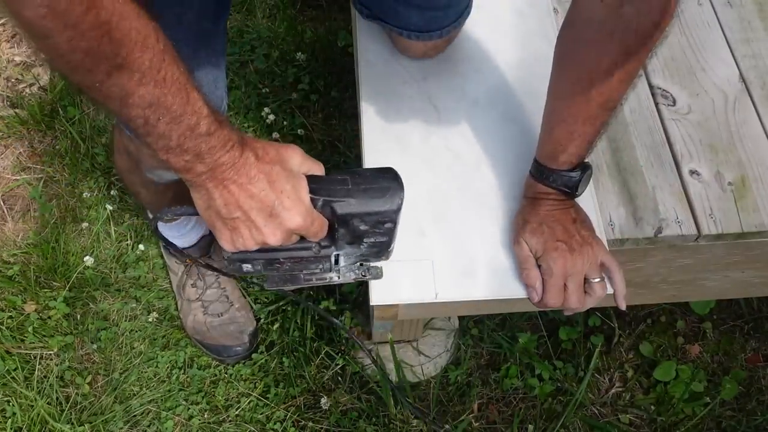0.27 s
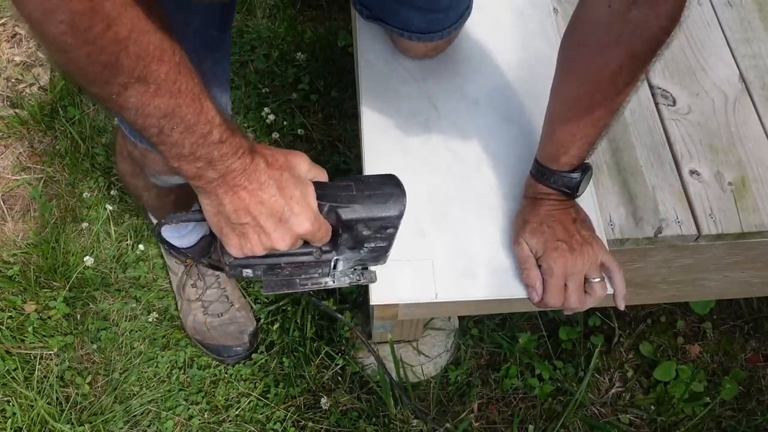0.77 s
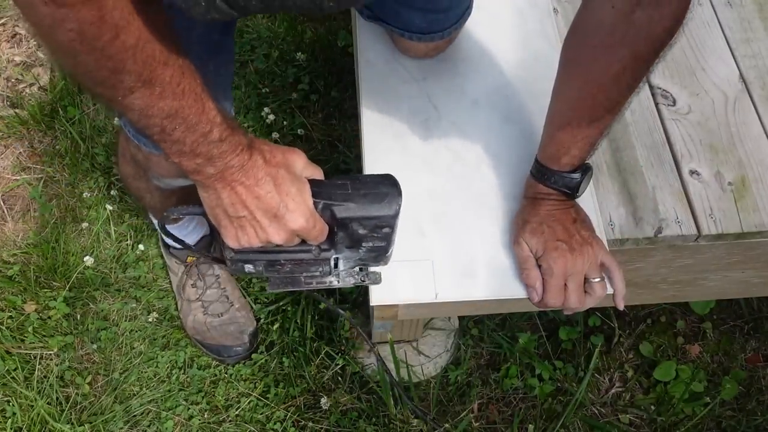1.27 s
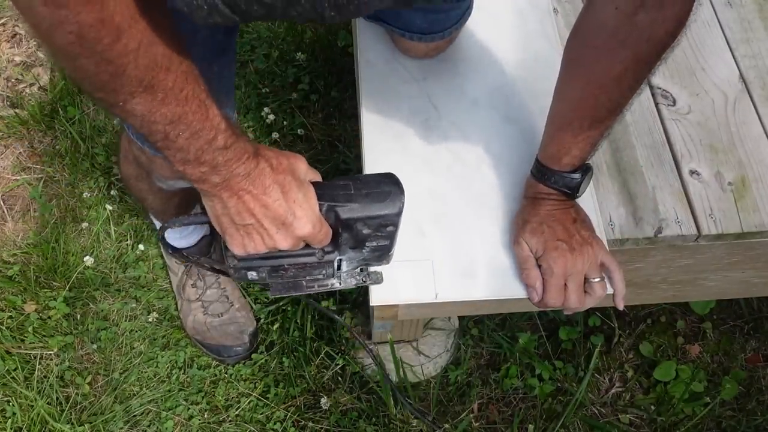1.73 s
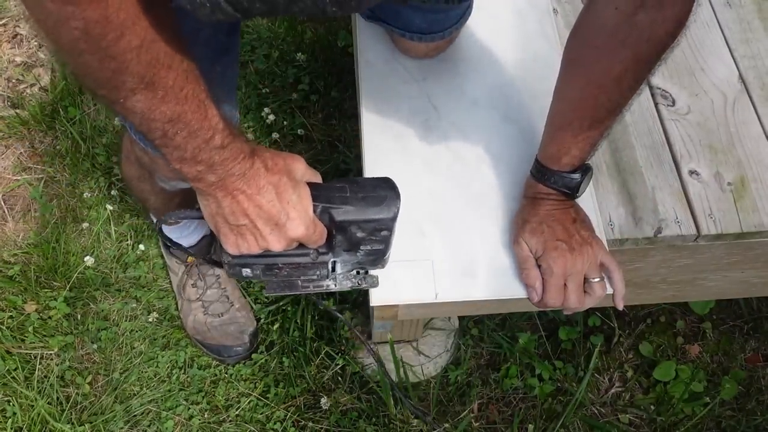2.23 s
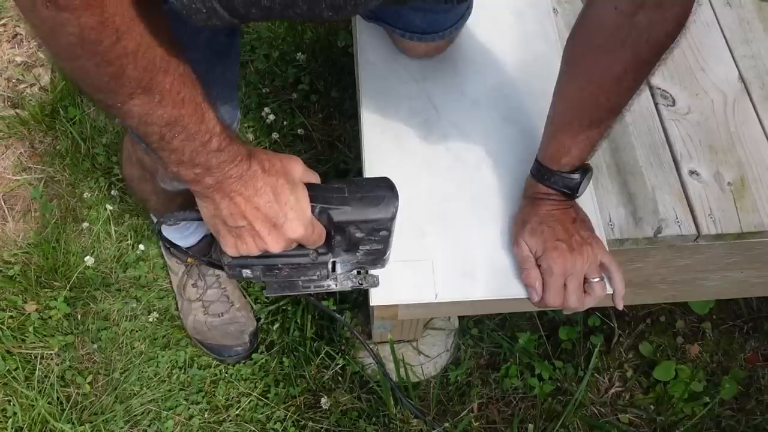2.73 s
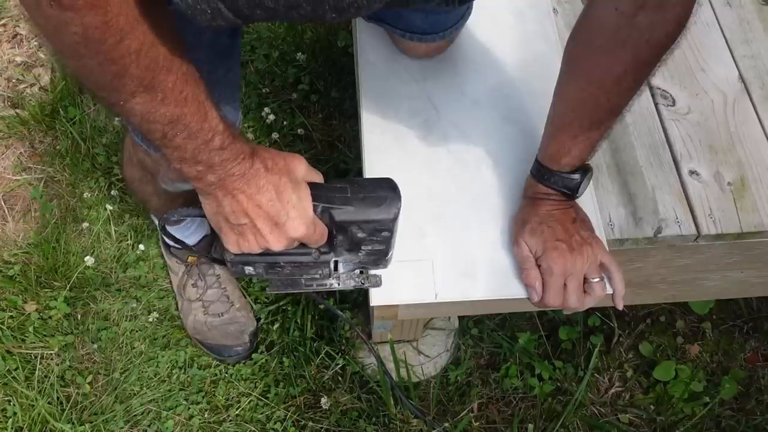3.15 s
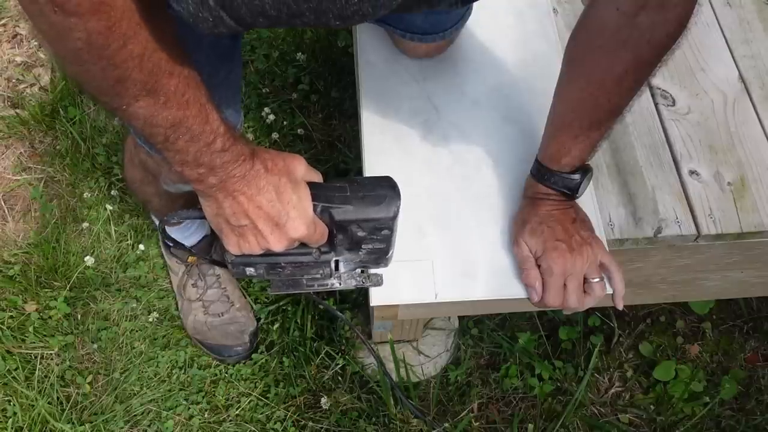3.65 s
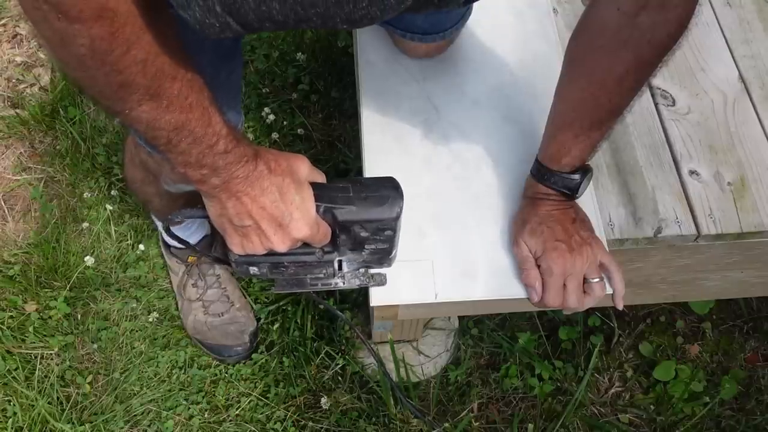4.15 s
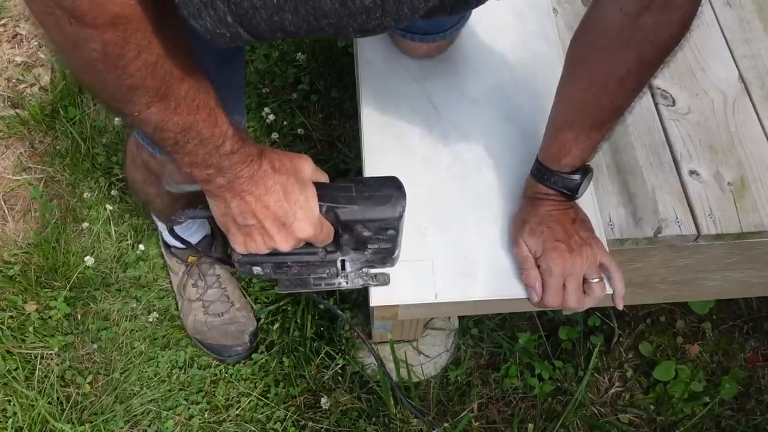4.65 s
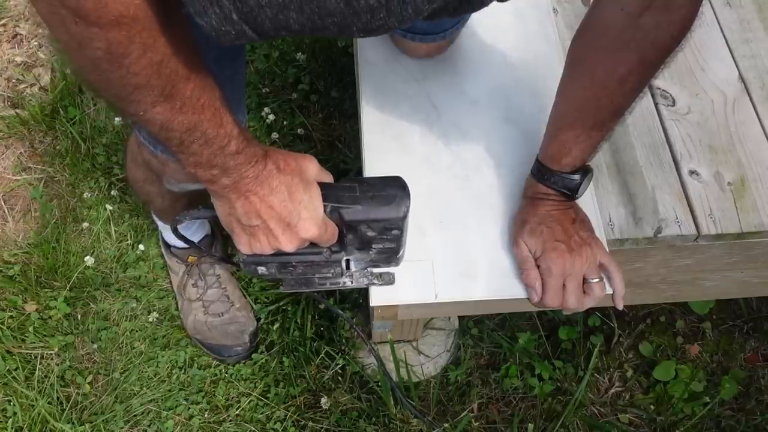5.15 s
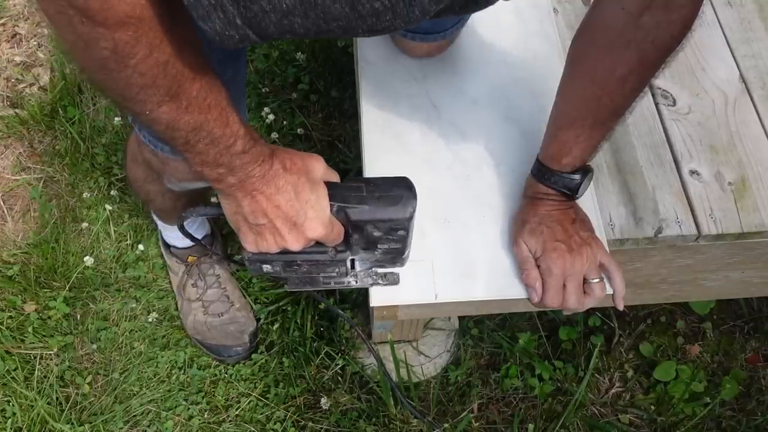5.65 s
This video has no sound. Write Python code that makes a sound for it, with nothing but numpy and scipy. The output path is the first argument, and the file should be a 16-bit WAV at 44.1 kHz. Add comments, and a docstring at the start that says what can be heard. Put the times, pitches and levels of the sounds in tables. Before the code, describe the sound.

Quiet garden with birdsong and insect chirps and a couple of shoe knocks, then a corded jigsaw roars into a wooden plank and keeps cutting.

```python
"""Jigsaw starting on a plank

A corded jigsaw starts on a plank that lies on a deck in a garden. The motor jerks its gears once per
mains cycle, the teeth rasp as noise that swells on every stroke, and housing, blade and plank ring.
The shoe knocks on the plank, mostly before and at the start. Two birds sing sine notes in the trees,
insects chirp in the grass, and filtered noise makes the breeze and the far rumble."""
import sys
import numpy as np
from scipy import signal
from scipy.fft import rfft, irfft, next_fast_len
from scipy.io import wavfile
from scipy.ndimage import uniform_filter1d, map_coordinates

SR = 44100
rng = np.random.default_rng(int(sys.argv[2]) if len(sys.argv) > 2 else 0)


def master(y):
    """Save y as 16-bit WAV."""
    cut = np.clip(np.atleast_2d(y).T, -1, 1)
    pcm = np.round(cut * 32767)  # scale
    wavfile.write(sys.argv[1], SR, pcm.astype(np.int16))


N = 259749
T = np.arange(N) / SR


def amp(db):
    """Decibels to amplitude."""
    return 10 ** (np.asarray(db) / 20)


def unit(x):
    """x scaled to an RMS of 1 over the whole scene."""
    return x / np.sqrt(np.mean(x ** 2) + 1e-20)


def noise():
    """White noise."""
    return rng.standard_normal(N)


def curves(rows):
    """One value per sample for each column after the time."""
    s, *cols = np.transpose(rows)
    return [np.interp(T, s, col) for col in cols]


def wobble(rate_hz):
    """A smooth random curve through rate_hz knots a second."""
    knots = rng.standard_normal(int(N * rate_hz / SR) + 4)
    return map_coordinates(knots, [T * rate_hz])


def filtered(x, response):
    """x times a complex response of frequency."""
    m = next_fast_len(N + SR // 2)
    return irfft(rfft(x, m) * response(np.fft.rfftfreq(m, 1 / SR)), m)[..., :N]


def coloured(x, spectrum):
    """x through (hz, gain_db) points on a log axis."""
    hz, db = np.transpose(spectrum)
    return filtered(x, lambda f: amp(np.interp(np.log(f + 1), np.log(hz + 1), db)))


def rung(x, modes):
    """x through causal resonances (hz, width_hz, gain_db) of alternating sign."""
    def response(f):
        total = 0
        for k, (hz, width, db) in enumerate(modes):
            resonance = 1j * f * width / (hz * hz - f * f + 1j * f * width)
            total = total + (-1) ** k * amp(db) * resonance
        return total
    return filtered(x, response)


def blows(times, gains):
    """Single sharp pushes, one sample each."""
    return np.bincount(np.round(np.asarray(times) * SR).astype(int), gains, N)[:N]


def bursts(times, gains, t60):
    """Noise that jumps up at each time and dies away 60 dB in t60 seconds."""
    shape = signal.lfilter([1], [1, -amp(-60 / (t60 * SR))], blows(times, gains))
    return shape * noise()


# Far rumble level: start_s, level_db
RUMBLE_LEVEL = [(0, -45), (.5, -44.5), (1.2, -44), (1.8, -46.5), (2.0, -54), (2.7, -56), (3.3, -58),
                (3.7, -59), (4.2, -62), (4.8, -56.5), (5.9, -44.5)]
# Spectra of rumble, leaf rustle and bright leaf shimmer: hz, gain_db
RUMBLE_SPECTRUM = [(12, -43), (28, -3), (48, -4.5), (97, -5), (135, -21), (206, -21), (242, -13.5),
                   (296, -49), (500, -45), (650, -71), (1100, -120)]
RUSTLE_SPECTRUM = [(76, -24), (130, 1.5), (189, -11), (248, -4), (301, -9.5), (468, -11.5), (620, -19),
                   (750, -18.5), (950, -19.5), (1250, -20.5), (1600, -23), (1810, -25), (2020, -32),
                   (3500, -25), (4550, -63), (7700, -120)]
SHIMMER_SPECTRUM = [(2060, -35), (3500, -6), (4440, 0.5), (6670, -8.5), (8300, -5), (11000, -14.5),
                    (15600, -16)]
# Far engine: pitch_hz, width_hz, gain_db
DRONE_MODES = [(92, 2.8, 1), (243.3, 8.7, -5)]
# Breeze in the leaves: start_s, strength_0_to_1
GUST_STRENGTH = [(0, 0.37), (.13, 0.5), (.3, 1), (.46, 0.94), (.87, 0.66), (1.05, 0.36), (1.5, 0.18),
                 (1.8, 0.6)]
# Narrow flickering hiss near 2 kHz: start_s, level_db
FAINT_BAND_LEVEL = [(0, -84), (.2, -64), (.5, -63), (.9, -69), (1.3, -85)]
# Air moving past the microphone: start_s, level_db
BUFFET_LEVEL = [(0, -45), (.4, -49), (.8, -63), (1.5, -66), (2.5, -63), (3.2, -66), (3.7, -62), (4.2, -66),
                (5.0, -53), (5.9, -58)]
RUSTLE_DB, SHIMMER_DB = (-60, 9), (-79.5, 20.5)  # (calm, gain at full gust)


def air():
    """Noise as rumble, drone, gusty leaves, a faint narrow band and air buffeting the microphone."""
    gust = curves(GUST_STRENGTH)[0]
    rumble = unit(coloured(noise(), RUMBLE_SPECTRUM))
    drone = amp(-12.5) * unit(rung(rung(noise(), DRONE_MODES), DRONE_MODES))
    far = amp(curves(RUMBLE_LEVEL)[0]) * (rumble + drone)
    rustle = amp(RUSTLE_DB[0] + RUSTLE_DB[1] * gust) * unit(coloured(noise(), RUSTLE_SPECTRUM))
    shimmer = amp(SHIMMER_DB[0] + SHIMMER_DB[1] * gust) * unit(coloured(noise(), SHIMMER_SPECTRUM))
    band = unit(rung(rung(noise(), [(2000, 150, 0)]), [(2000, 200, 0)]))
    band = band * amp(curves(FAINT_BAND_LEVEL)[0] + 1.9 * wobble(31.7))
    buffet = unit(coloured(noise(), [(8, -30), (18, 0), (35, -5), (55, -25), (120, -80)]))
    return far + rustle + shimmer + band + amp(curves(BUFFET_LEVEL)[0]) * buffet


def note(rows, edge_s=0.0029):
    """A sine along (start_s, pitch_hz, level_db) rows with soft ends."""
    s, hz, db = np.transpose(rows)
    end_s = s[-1] + edge_s
    span = slice(round(s[0] * SR), round(end_s * SR))
    t, out = T[span], np.zeros(N)
    ends = np.clip(np.minimum(t - s[0], end_s - t) / edge_s, 0, 1)
    phase = 2 * np.pi * np.cumsum(np.interp(t, s, hz)) / SR
    out[span] = np.sqrt(2) * ends * amp(np.interp(t, s, db)) * np.sin(phase)
    return out


# Runs of cricket chirps: start_s, chirp_count
CRICKET_RUNS = [(.027, 12), (.689, 1), (.760, 20)]
# Katydid buzzes: start_s
BUZZ_STARTS = [.08, .28, .5, .73, .965, 1.195, 1.42, 1.655]
CHIRP_EVERY_S, BUZZ_S = .054, 0.047
CHIRP_AT_0S_DB, BUZZ_AT_0S_DB, FADE_DB_PER_S = -63, -69.5, 1.5


def insects():
    """Short pure cricket chirps, slower and higher katydid noise buzzes, and a steady far chorus."""
    times = np.concatenate([s + CHIRP_EVERY_S * np.arange(count) for s, count in CRICKET_RUNS])
    cricket = np.zeros(N)
    for s in times:
        db = CHIRP_AT_0S_DB - FADE_DB_PER_S * s
        cricket += note([(s, 8100, db), (s + 0.012, 8080, db), (s + 0.019, 8050, db - 5)])
    gate = sum((T > s) & (T < s + BUZZ_S) for s in BUZZ_STARTS)
    buzz = unit(rung(rung(noise(), [(9100, 300, 0)]), [(9100, 300, 0)]))
    katydid = amp(BUZZ_AT_0S_DB - FADE_DB_PER_S * T) * gate * buzz
    swarm = [(7620, 700, -2.0), (8350, 500, -1)]
    chorus = amp(-74 + 1.2 * wobble(18.2)) * unit(rung(rung(noise(), swarm), swarm))
    return cricket + katydid + chorus


# Shoe contacts, drive into each filter: start_s, tap_db, thud_db, snap_db
SHOE_KNOCKS = [(0.086, -43, -45, -62), (0.094, -38, -52, -58), (0.101, -31, -39, -62),
               (0.112, -42, -41, -52), (0.13, -23, -38.5, -26), (0.833, -9.5, -28.5, -53),
               (1.027, -40, -50, -70), (1.036, -33.5, -47, -62), (1.047, -43, -45, -66),
               (1.057, -49, -45, -60), (1.187, -57, -65, -52), (1.652, -41, -57, -70),
               (1.727, -35, -60, -62), (1.779, -36, -54, -61), (1.8, -29, -47, -50), (1.813, -28, -49, -24),
               (1.818, -13, -28, -23), (1.829, -15, -24, -31), (3.011, -11, -36.5, -32),
               (3.055, -13, -43, -30), (4.214, -5.5, -36, -29), (4.258, -5, -42, -29)]
# Shoe tap and deck resonances: pitch_hz, width_hz, gain_db
TAP_MODES = [(685, 120, 0), (1300, 240, -3.5), (1720, 94, -3.5), (2100, 200, -3.5), (3430, 1100, -16)]
DECK_MODES = [(48, 43, -24), (89, 38, -21), (139, 11.3, 6.5), (247, 74, -5.5), (431, 21, 2.5)]


def knocks():
    """Each contact taps the shoe, thuds in the deck and snaps in the treble."""
    s, tap_db, thud_db, snap_db = np.transpose(SHOE_KNOCKS)
    push = rung(blows(s, amp(tap_db)), [(1490, 4200, 0)])
    tap = rung(amp(6.0) * bursts(s, amp(tap_db), t60=0.047) + amp(12.0) * push, TAP_MODES)
    thud = amp(50.5) * rung(rung(blows(s, amp(thud_db)), DECK_MODES), [(242, 2500, 0)])
    snap = rung(bursts(s, amp(snap_db), t60=0.01), [(5900, 3000, 0)])
    return tap + thud + amp(-10.0) * rung(snap, [(5000, 8000, 0)])


def song(parts, calls):
    """One pattern of notes sung at each call's (start_s, level_db, pitch_ratio)."""
    out = np.zeros(N)
    for s, db, ratio in calls:
        for part in parts:
            out += note(np.multiply(part, [1, ratio, 1]) + [s, 0, db])
    return out


def trees(x, t60):
    """Echoes from trunks and leaves: a decaying noise tail."""
    t = T[:SR // 2]
    tail = rng.standard_normal(len(t)) * amp(-60 * t / t60)
    return signal.fftconvolve(x, tail / np.linalg.norm(tail))[:N]


# Wren phrase and trill turn, note by note, from the call's start, level and pitch ratio:
# offset_s, pitch_hz (at ratio 1), level_db (relative)
WREN_PHRASE = [
    [(-.008, 2200, -13), (.01, 2290, -5), (.036, 2310, -3), (.05, 2320, -7), (.082, 2330, -11)],
    [(.036, 2330, -10), (.046, 2650, -9)],
    [(.052, 2850, -14), (.059, 2700, -11), (.062, 2650, 1), (.074, 2450, -2)],
    [(.106, 1650, -9), (.115, 2500, -5), (.128, 3150, -5), (.14, 3450, -1), (.152, 3550, -8)],
    [(.191, 4400, -12), (.197, 4150, -10), (.201, 3700, -9), (.207, 3050, -9), (.211, 2880, -1),
     (.223, 2820, -3)],
]
TRILL_TURN = [
    [(-.012, 4240, -9), (.01, 4410, -6)],
    [(.002, 5160, -12), (.02, 4990, -3), (.046, 4810, -6)],
    [(.036, 4680, -7), (.05, 4100, -6), (.062, 3520, -7), (.075, 3100, -15)],
    [(.05, 5100, -10), (.075, 5010, -19), (.104, 4900, -16)],
]
# Second bird's long note: start_s, pitch_hz, level_db
WHISTLE_NOTE = [(0.54, 3000, -60), (0.55, 3000, -48), (0.584, 3090, -48), (0.602, 3160, -39.5),
                (0.665, 3236, -50), (0.682, 3032, -46), (0.71, 3220, -47.5), (0.83, 3192, -55),
                (0.9, 3170, -71)]
WREN_S, WREN_EVERY_S, WREN_DB, WREN_SWELL_DB = .334, .2322, -48.5, 0.57  # swell per phrase
WREN_PITCH_RATIO, WREN_RISE = .98, 0.0044  # first phrase, rise per phrase
TRILL_S, TRILL_EVERY_S, TRILL_DB = .869, .1008, -45.5
TRILL_FADE_DB, TRILL_SAG = 0.36, .006  # loss times turn number squared, pitch ratio lost per turn


def birds():
    """The wren repeats one phrase; the other bird whistles, then trills hoarsely, deeper in the trees."""
    phrases, turns = [], []
    for k in range(7):
        pitch_ratio = WREN_PITCH_RATIO + WREN_RISE * k
        phrases.append((WREN_S + WREN_EVERY_S * k, WREN_DB + WREN_SWELL_DB * k, pitch_ratio))
        turns.append((TRILL_S + TRILL_EVERY_S * k, TRILL_DB - TRILL_FADE_DB * k ** 2, 1 - TRILL_SAG * k))
    wren = song(WREN_PHRASE, phrases) * amp(3 * wobble(170)) * (1 + .3 * wobble(600))
    whistle = note(WHISTLE_NOTE, edge_s=0.013) * amp(1.4 * wobble(54.6))
    trill = song(TRILL_TURN, turns) * amp(1.5 * wobble(110)) * (1 + .7 * wobble(450))
    near = wren + whistle
    near_echoes = amp(-7) * (trees(near, t60=0.1) + trees(near, t60=1.0))
    return near + near_echoes + trill + amp(-0.5) * trees(trill, t60=0.41)


# Blade speed, held from each row on: start_s, stroke_rate_hz
STROKE_RATE = [(1.8, 20.625), (3.0, 21.45), (3.2, 23.45), (4.0, 22.2), (4.2, 21.25), (4.6, 23.25),
               (4.8, 24.2), (5.0, 22.7)]
FIRST_STROKE = .4  # part of a stroke done at time zero


def crank():
    """Blade strokes made so far; the stepped speed is smoothed over 1/6 s."""
    s, rate = np.transpose(STROKE_RATE)
    speed = rate[np.maximum(np.searchsorted(s, T) - 1, 0)] * (T > s[0])
    return FIRST_STROKE + np.cumsum(uniform_filter1d(speed, size=SR // 6, mode="nearest")) / SR


# How hard the teeth bite (first touch, pull back, cut proper): start_s, bite_0_to_1
TOOTH_BITE = [(1.82, 0.58), (1.92, 0.05), (1.97, 0.86), (2.18, 0.95), (2.195, 0.8), (2.235, 0.15),
              (2.42, 0.33), (2.56, 0.38), (2.72, 0.75), (3.1, 0.82)]
CUT_S = (3.87, 4.25)  # the blade sinks to full depth between these times


def loaded(law):
    """A level from (no bite dB, gain at full bite dB, further gain at full depth dB)."""
    idle_db, bite_db, deep_db = law
    return idle_db + bite_db * curves(TOOTH_BITE)[0] + deep_db * np.interp(T, CUT_S, [0, 1])


def rasp(spiky_db, clump_db):
    """Teeth tearing fibres: noise of uneven sizes, in clumps of a few ms."""
    spikes = np.minimum(rng.exponential(size=N), 5)
    sizes = amp(spiky_db * spikes + clump_db * wobble(170))
    return unit(sizes * noise())


# Housing and shoe resonances: pitch_hz, width_hz, gain_db
HOUSING_MODES = [(1260, 186, -4.5), (1662, 169, -2), (2042, 174, 1), (2350, 170, -1.5), (2630, 270, -3),
                 (3320, 760, -9.5), (4220, 660, -11.5), (5750, 920, -18.5)]
SHOE_MODES = [(755, 60, 0)]
# Treble of the rasp: hz, gain_db
HISS_SPECTRUM = [(2940, -5), (5000, -6), (6690, 0), (8650, 7), (10100, -5.5), (13100, -0.5), (15600, -3)]
# Shoe ring: start_s, level_db
SHOE_LEVEL = [(1.82, -27), (1.93, -40), (2.0, -29.5), (2.17, -28.5), (2.21, -31), (2.24, -31), (2.42, -30),
              (2.55, -35.5), (2.7, -37.5), (2.9, -40.5), (3.4, -40), (3.8, -45.5), (4.2, -33.5), (4.6, -54),
              (5.0, -40.5), (5.9, -35.5)]
HOUSING_DB, HISS_DB = (-28, 4.5, -0.5), (-56, 14, 3)  # laws for loaded()
SWELL_DB = (0.53, .5, 3)  # law for the swing over one stroke


def blade():
    """The rasp rings housing and shoe and swells on every stroke; the hiss swells more than the housing."""
    stroke = loaded(SWELL_DB) * np.cos(2 * np.pi * crank())
    uneven = wobble(35)  # the feed of the hand and the grain of the plank
    teeth = rasp(spiky_db=3.5, clump_db=2.5)
    housing = unit(rung(teeth, HOUSING_MODES))
    housing = housing * amp(loaded(HOUSING_DB) + 0.5 * stroke + 0.057 * uneven)
    hiss = unit(coloured(teeth, HISS_SPECTRUM))
    hiss = hiss * amp(loaded(HISS_DB) + 0.88 * stroke + uneven)
    shoe = unit(rung(rasp(spiky_db=1.5, clump_db=0.0), SHOE_MODES))
    return housing + hiss + amp(curves(SHOE_LEVEL)[0] + 1.4 * stroke) * shoe


# Narrow blade resonances: pitch_hz, width_hz, gain_db
BLADE_MODES = [(1580, 48, 1), (1710, 68, -0.5), (1896, 53, 1), (2030, 65, -1.5), (2107, 32, 1.5),
               (2214, 66, -7), (2363, 24, 5), (2650, 42, -2.5), (2680, 61, -4), (3580, 75, -4.5),
               (4716, 75, -9), (4810, 59, -12.5), (6140, 120, -19)]
BLADE_DB, BLADE_WAVER_DB = (-35, 7.5, -0.5), 2.5  # law for loaded(); each mode wavers on its own


def blade_ring():
    """The blade's narrow modes come and go as the kerf grips and frees it."""
    teeth = rasp(spiky_db=3.0, clump_db=3.5)
    modes = np.zeros(N)
    for hz, width, db in BLADE_MODES:
        mode = signal.lfilter(*signal.iirpeak(hz, hz / width, SR), teeth)
        modes += amp(db + BLADE_WAVER_DB * wobble(8)) * mode
    stroke = loaded(SWELL_DB) * np.cos(2 * np.pi * crank())
    return amp(loaded(BLADE_DB) + 0.86 * stroke) * unit(modes)


# Resonances of plank, its free end, and its thump on the deck: pitch_hz, width_hz, gain_db
PLANK_MODES = [(132.6, 11.6, -11), (255, 54, 0), (318, 66, 0), (398, 54, 2.5), (583, 103, -1),
               (913, 260, -2.5)]
FREE_END_MODES = [(175.4, 32, 0)]
THUMP_MODES = [(184, 105, -6.5), (273, 74, -2), (288, 53, -1), (414, 41, -8.5), (650, 170, -8.5)]
# How loosely the plank lies on the deck: start_s, looseness_0_to_1
LOOSENESS = [(2.9, 0.4), (3.2, 0.34), (4.1, 0.57), (4.3, 0.9), (4.4, 0.82), (4.6, 0.7), (4.95, 0.93),
             (5.25, 0.97), (5.45, 0.76), (5.9, 0.8)]
# Spells of the free end bouncing: start_s, length_s, level_db
BOUNCE_SPELLS = [(1.815, 0.024, -33.5), (2.01, 0.24, -36.5), (2.36, 0.046, -36), (3.02, 0.049, -42),
                 (5.376, 0.14, -40.5)]
# Rocking partials: stroke_rate_multiple, level_db (relative)
ROCK_PARTIALS = [(1, -20), (2, -14), (3, 1), (4, 5), (5, -12), (6, 9.5)]
SHAKE_DB, THUMP_DB, ROCK_DB = (-36, 7.5), (-59.5, 23.5), (-83, 52.5)  # (tight, gain per looseness)
ROCK_FULL = 0.707  # looseness at which the rocking stops growing
BOUNCE_REST_DB, BOUNCE_SLOPE_DB_PER_S = -53.5, 145  # between spells; rise and fall
SHAKE_PER_BOUNCE = 0.1  # dB of shaking per dB of bounce


def plank():
    """The plank shakes, its free end bounces, every stroke thumps it on the deck and rocks the saw."""
    loose, made = curves(LOOSENESS)[0], crank()
    bounce_db = np.full(N, BOUNCE_REST_DB)
    for s, length, db in BOUNCE_SPELLS:
        outside_s = np.maximum(0, np.maximum(s - T, T - s - length))
        bounce_db = np.maximum(bounce_db, db - BOUNCE_SLOPE_DB_PER_S * outside_s)
    shake_db = SHAKE_DB[0] + SHAKE_DB[1] * loose + SHAKE_PER_BOUNCE * (bounce_db - BOUNCE_REST_DB)
    drive = rasp(spiky_db=3.0, clump_db=3.0)
    shake = amp(shake_db + 0.79 * wobble(20)) * unit(rung(drive, PLANK_MODES))
    bounce = amp(bounce_db) * unit(rung(rung(drive, FREE_END_MODES), FREE_END_MODES))

    stroke_times = np.flatnonzero(np.diff(np.floor(made))) / SR
    hits = blows(stroke_times, amp(1.2 * rng.standard_normal(len(stroke_times))))
    thump = unit(rung(rung(hits, THUMP_MODES), [(343, 1600, 0)]))
    thump = thump * amp(THUMP_DB[0] + THUMP_DB[1] * loose)

    rock = np.zeros(N)
    for k, db in ROCK_PARTIALS:
        rock += amp(db + 2.2 * wobble(11.0)) * np.sin(2 * np.pi * (k * made + rng.random()))
    rock = amp(ROCK_DB[0] + ROCK_DB[1] * np.minimum(loose, ROCK_FULL)) * unit(rock)
    return shake + bounce + thump + rock


# Gearbox resonances: pitch_hz, width_hz, gain_db
GEARBOX_MODES = [(735, 270, -1), (1280, 460, -4.5), (1667, 280, 2.5), (1994, 197, 5), (2726, 270, 1),
                 (3580, 350, -6.5), (4640, 190, -4), (5600, 360, -10.5), (6580, 580, -15.5),
                 (9200, 3900, -22), (12600, 4300, -27.5)]
# Further single jolts of the gears, some as the blade catches, some extra early jerks: start_s, strength_db
GEAR_JOLTS = [(1.818, 2.5), (1.829, -1), (1.843, -25), (1.887, -23), (1.919, -16), (1.955, -3),
              (2.29, -11), (2.57, 2.5), (2.6518, 0), (2.8193, -7), (2.8696, -9), (3.086, -12), (3.136, -1),
              (3.3013, -7), (3.816, -12), (3.985, -5.5), (4.033, 0), (4.1171, -0.5), (4.302, -7),
              (4.4586, 0), (5.0515, -7), (5.268, -3), (5.3603, -8), (5.6659, -2), (5.806, -6)]
RATTLE_DB, RATTLE_PER_S = (-42.5, 12.5, -3), 130  # law for loaded(); mean rate
TAUT_S, TAUT_DB = (1.965, 2.215), -8  # under the first touch the gears stay meshed, jerks soften


def rattle():
    """Loose teeth chatter at random, harder on the cutting stroke; further single blows jolt the gears."""
    luck = rng.random((round(RATTLE_PER_S * N / SR), 2))
    times = luck[:, 0] * T[-1]
    stroke = np.cos(2 * np.pi * np.interp(times, T, crank()))
    sizes = amp(14.0 * luck[:, 1] + 2.9 * stroke)
    sizes = sizes * amp(-5 * (times < TAUT_S[1]))  # softer until the cut proper
    chatter = amp(loaded(RATTLE_DB)) * unit(rung(bursts(times, sizes, t60=0.012), GEARBOX_MODES))
    s, db = np.transpose(GEAR_JOLTS)
    return chatter + rung(bursts(s, amp(db), t60=0.0086), GEARBOX_MODES)


MAINS_HZ, FIRST_JERK_S = 60.1, 1.8563  # first jerk before the early shift
EARLY_MS, SETTLED_S = 2.3, 2.1  # the speed control fires early until the motor has settled
JERK_DB = (-22.5, -10, -1)  # law for loaded()
TICK_DB, SHOE_STRUCK_DB = -13, -2.5  # bright tick over the jerk's rattle; shoe ring over the rasp's


def gears():
    """One blow per mains cycle as the speed control fires: push, short rattle, tick and shoe ring."""
    times = np.arange(FIRST_JERK_S, N / SR, 1 / MAINS_HZ)
    times = times - EARLY_MS / 1000 * (times < SETTLED_S)
    luck = rng.standard_normal((len(times), 2))
    times = np.clip(times + .0003 * luck[:, 0], 0, T[-1])
    taut = (times > TAUT_S[0]) & (times < TAUT_S[1])
    sizes = amp(1.4 * luck[:, 1] + TAUT_DB * taut)
    pushes = blows(times, sizes)
    hits = bursts(times, sizes, t60=0.017) + amp(19.0) * rung(pushes, [(1280, 2400, 0)])
    tick_modes = [(4680, 420, 6), (6640, 600, -1.5), (11000, 6000, -17)]
    tick = amp(TICK_DB) * unit(rung(bursts(times, sizes, t60=0.011), tick_modes))
    shoe = unit(rung(rung(pushes, SHOE_MODES), [(760, 130, 0)]))
    shoe = shoe * amp(curves(SHOE_LEVEL)[0] + SHOE_STRUCK_DB)
    return amp(loaded(JERK_DB)) * (unit(rung(hits, GEARBOX_MODES)) + tick) + shoe


# The loose plank slaps the deck: start_s, level_db (before rise and decay), pitch_hz
PLANK_SLAPS = [(4.184, -17, 244), (4.231, -14, 200), (4.274, -14.5, 200), (4.341, -18.5, 374),
               (4.373, -17, 214.5), (4.42, -15, 229), (4.479, -15.5, 354), (4.527, -12, 276),
               (4.558, -14, 242), (4.617, -18, 350), (4.659, -34, 264), (4.706, -17, 397),
               (4.744, -15, 400), (4.79, -22, 204), (4.833, -24, 417), (4.877, -19, 266), (4.916, -17, 413),
               (4.96, -22, 410), (5.303, -23, 392)]
SLAP_RISE_S, SLAP_T60_S, SLAP_THUD_DB = 0.0052, 0.068, 40.5  # thud drive over the slap's level


def slaps():
    """Each slap thuds broadly and rings the plank at the pitch of the spot that lands."""
    out, t = np.zeros(N + SR), T[:SR // 4]
    rise = 1 - np.exp(-t / SLAP_RISE_S)
    for s, db, hz in PLANK_SLAPS:
        ring = amp(db - 60 * t / SLAP_T60_S) * rise * np.sin(2 * np.pi * hz * t)
        out[round(s * SR):][:len(t)] += ring
    s, db, _ = np.transpose(PLANK_SLAPS)
    thud = rung(blows(s, amp(db + SLAP_THUD_DB)), THUMP_MODES)
    return out[:N] + rung(thud, [(336, 220, 0)])


START_S = 1.8175
LULL_S, LULL_DB = (2.185, 2.219), -6.  # the blade lifts off and gears and teeth fall quiet


def scene():
    """Garden and shoe knocks throughout; the saw and what it shakes sound from the start on."""
    in_lull = (T > LULL_S[0]) & (T < LULL_S[1])
    lull = amp(uniform_filter1d(LULL_DB * in_lull, size=SR // 200))
    saw = lull * (blade() + rattle() + gears()) + blade_ring()
    running = (saw + plank() + slaps()) * (T > START_S)
    return (air() + insects() + knocks() + birds() + running)[None]


TOP_HZ = 15790


def record(dry):
    """The microphone hisses faintly, peaks are rounded off, nothing passes above the band limit."""
    ceiling, hardness = .38, 6
    live = dry + amp(-92) * noise()
    clipped = live / (1 + np.abs(live / ceiling) ** hardness) ** (1 / hardness)
    return filtered(clipped, lambda hz: hz < TOP_HZ)


dry = scene()
out = record(dry)
master(out)
```